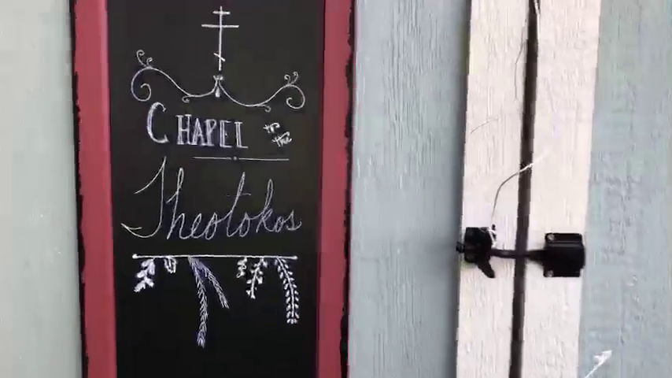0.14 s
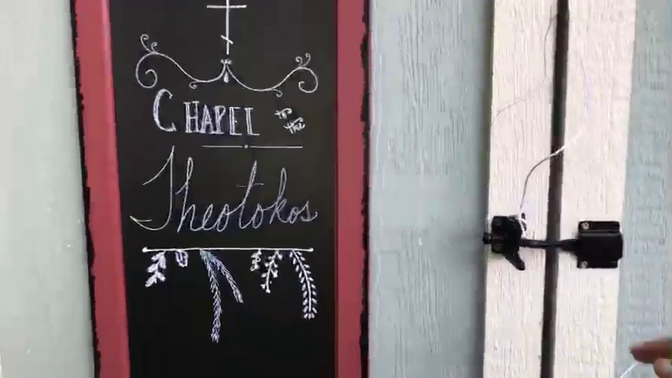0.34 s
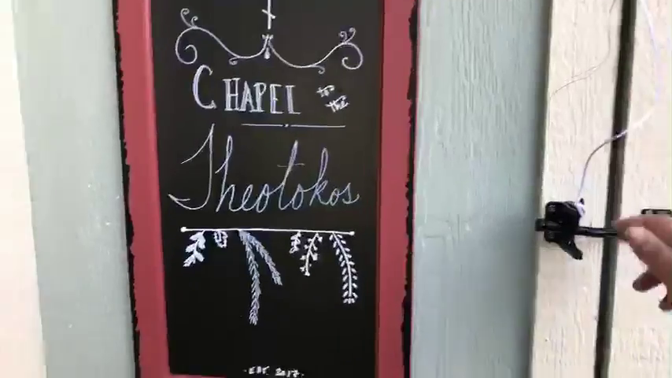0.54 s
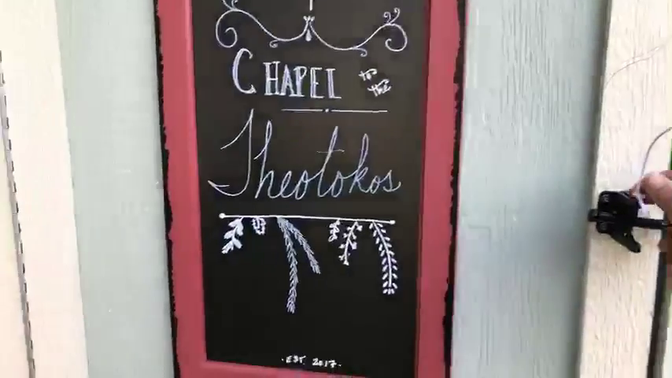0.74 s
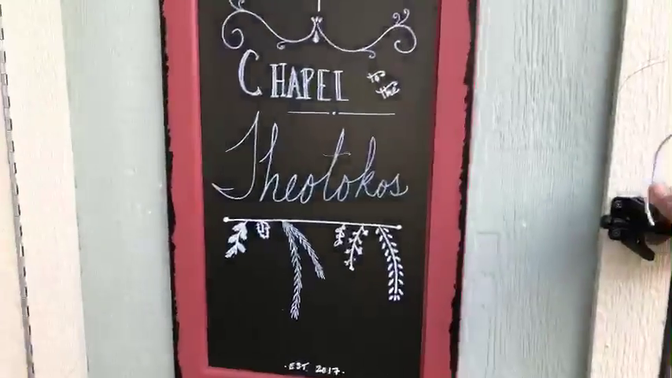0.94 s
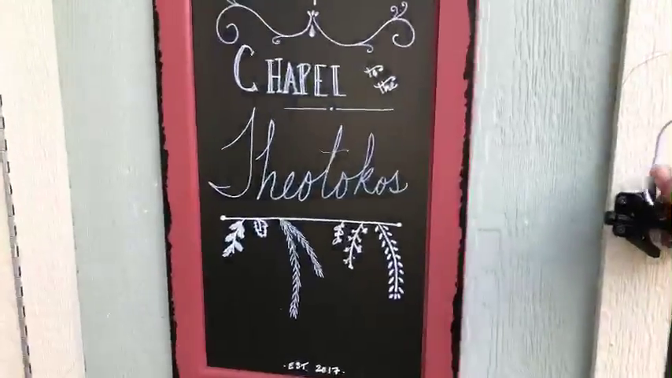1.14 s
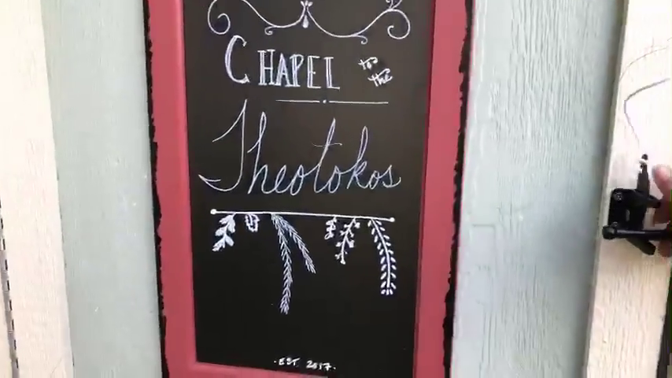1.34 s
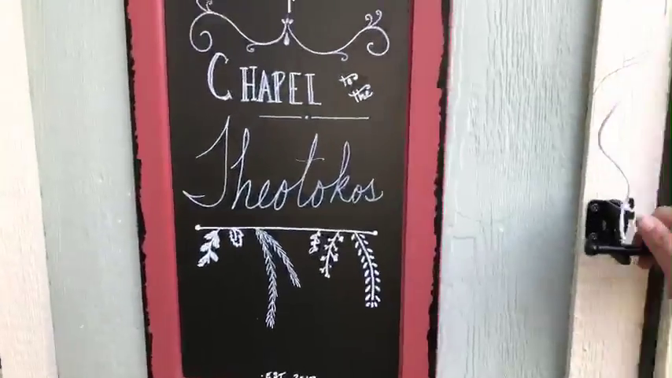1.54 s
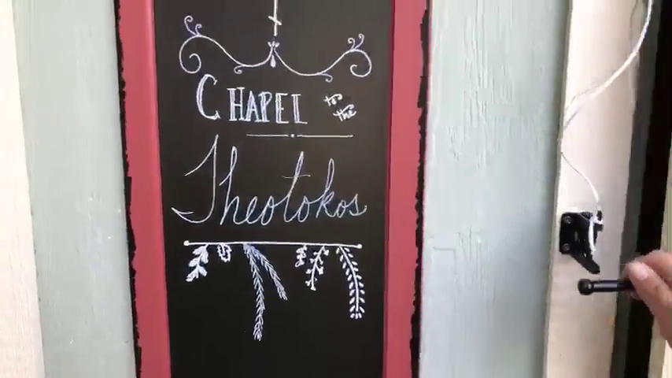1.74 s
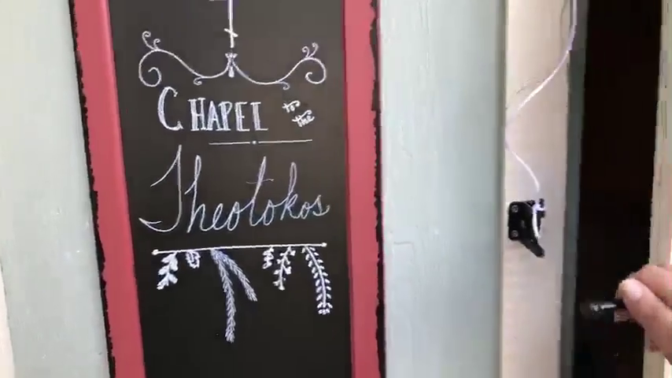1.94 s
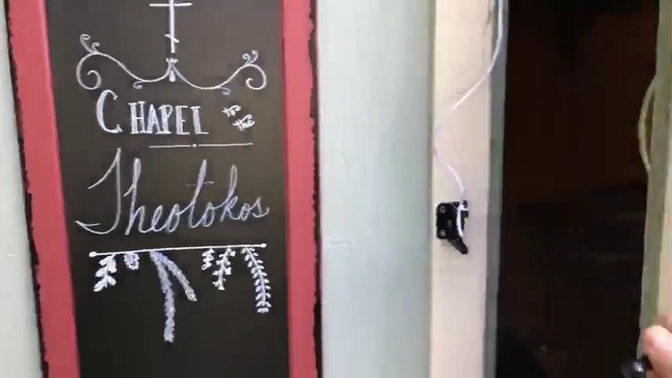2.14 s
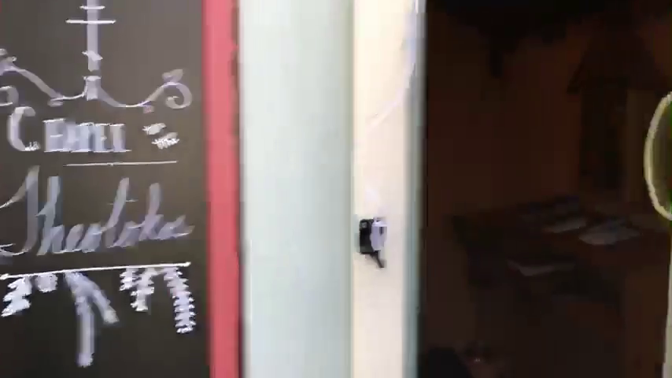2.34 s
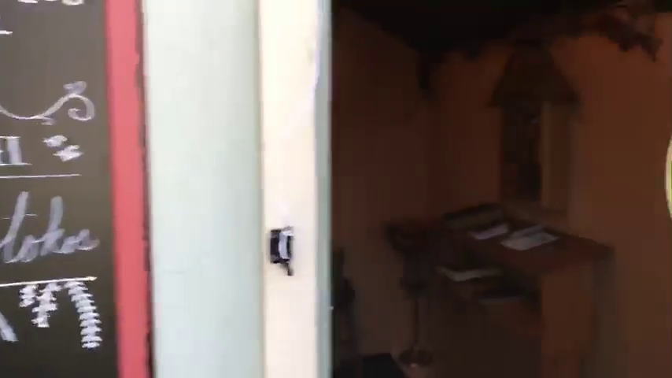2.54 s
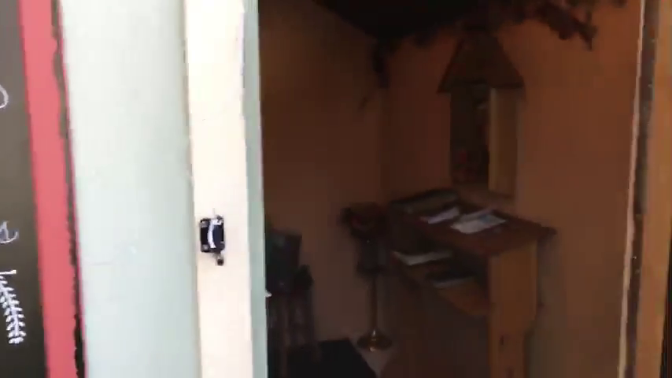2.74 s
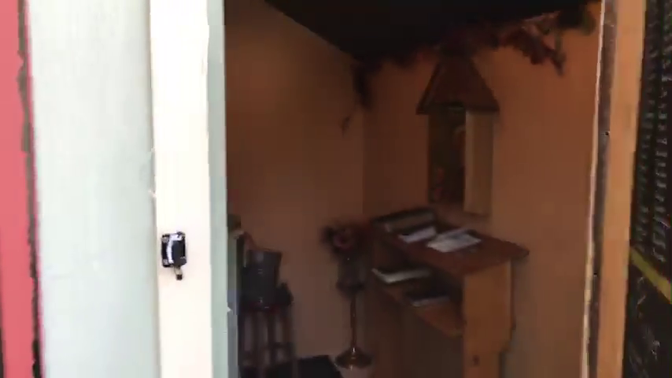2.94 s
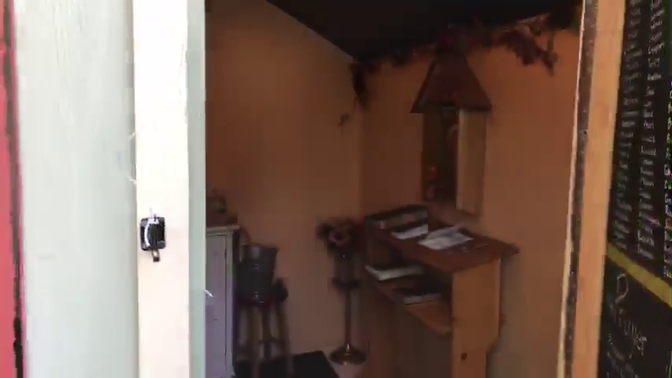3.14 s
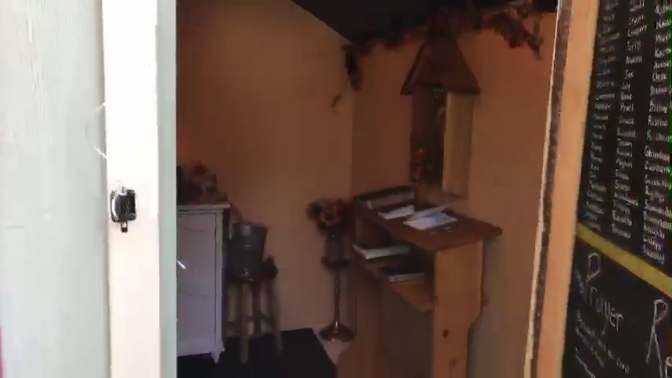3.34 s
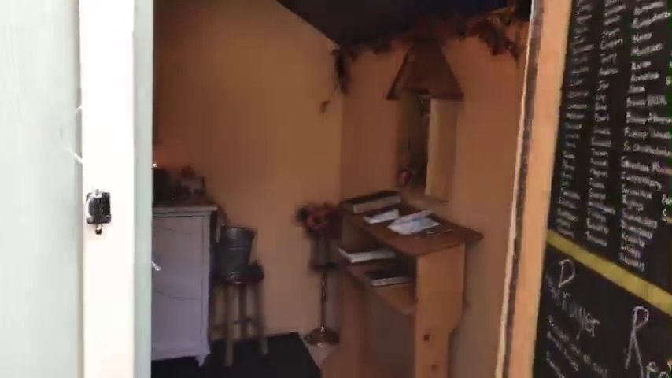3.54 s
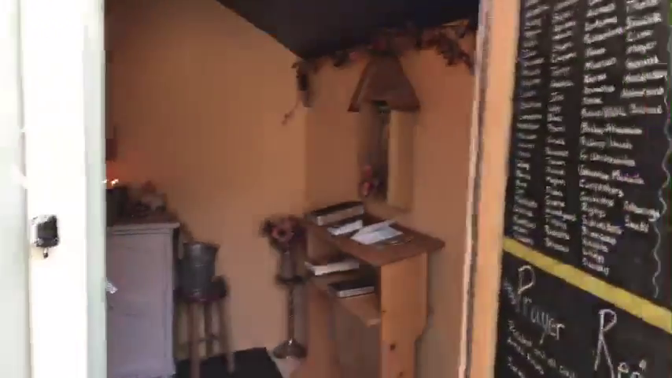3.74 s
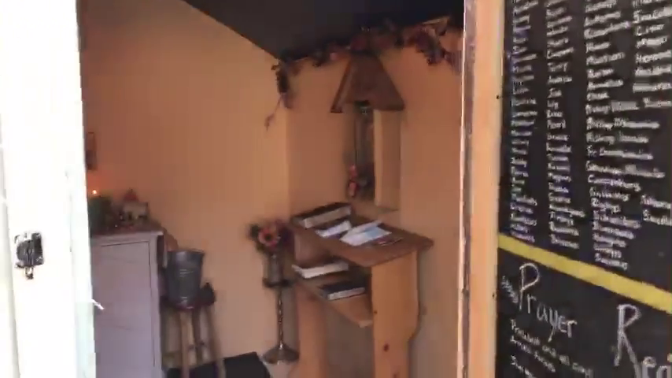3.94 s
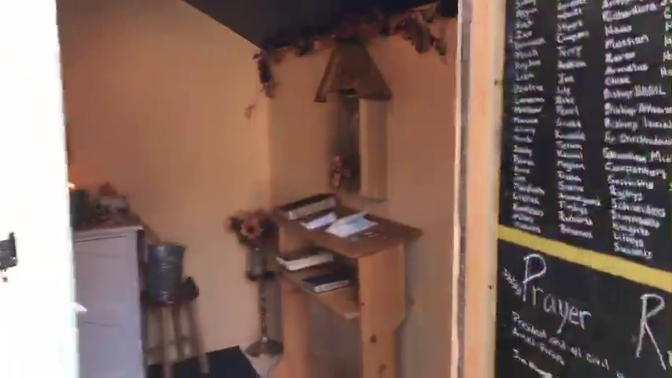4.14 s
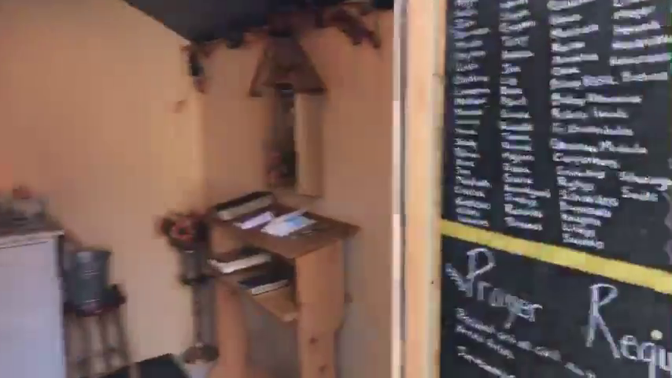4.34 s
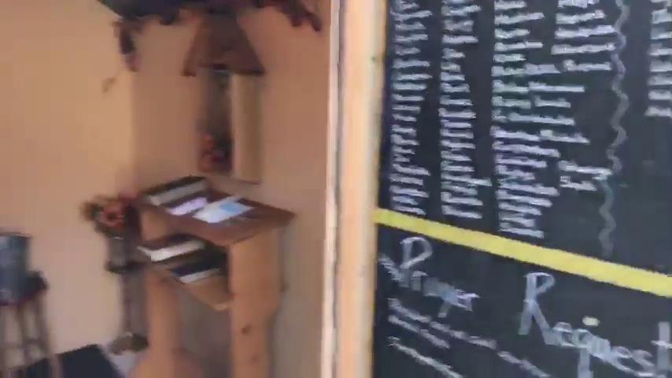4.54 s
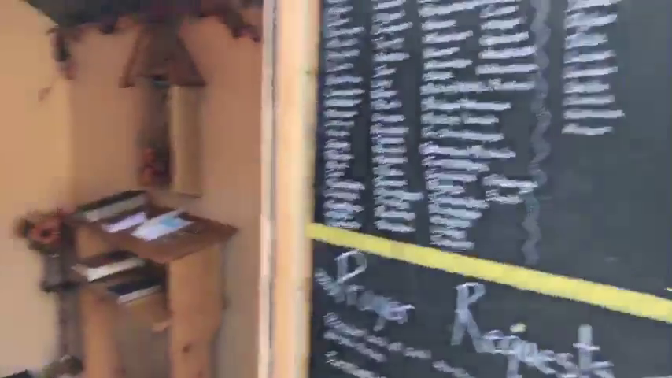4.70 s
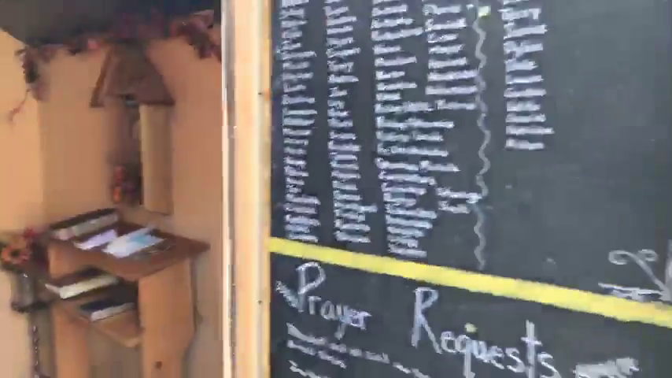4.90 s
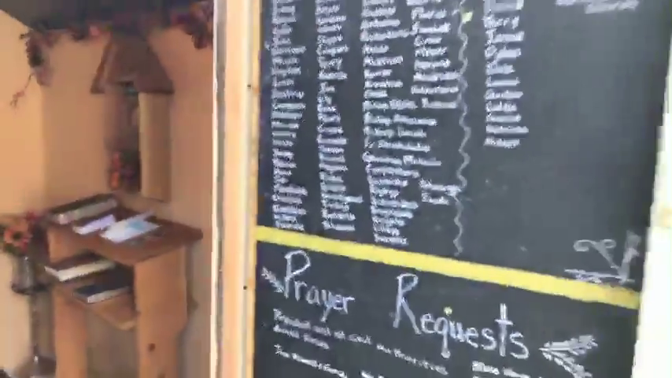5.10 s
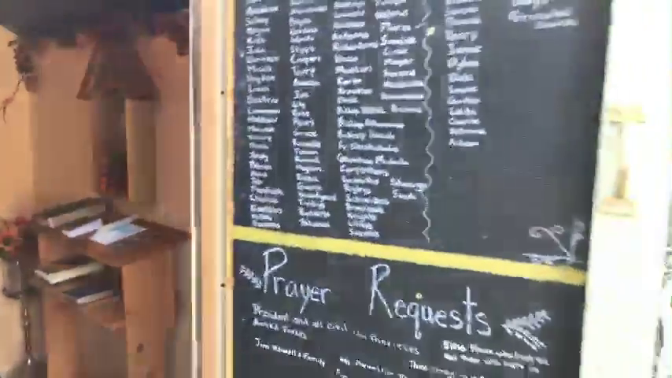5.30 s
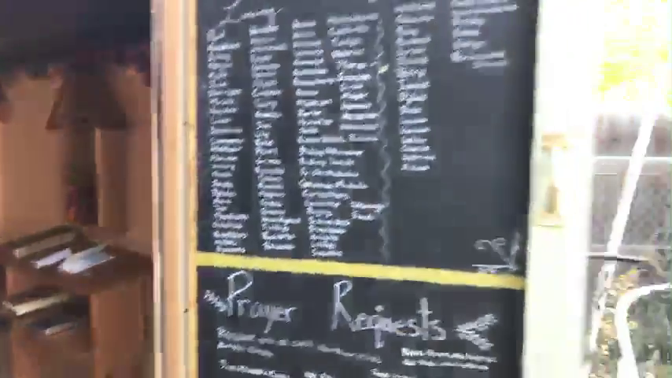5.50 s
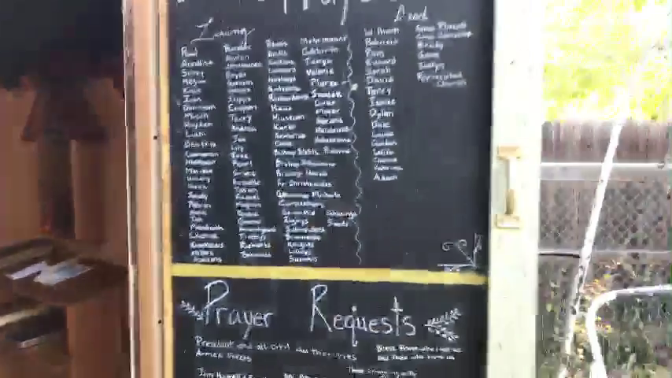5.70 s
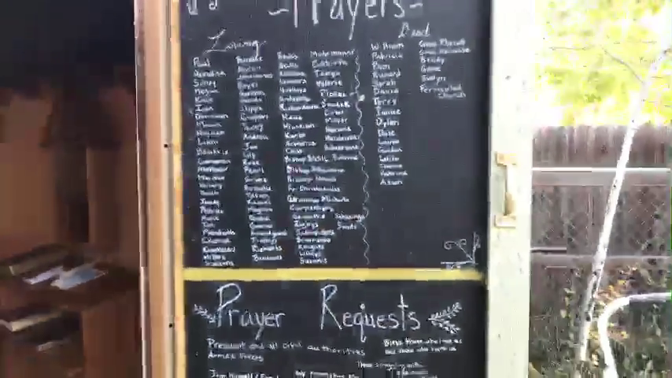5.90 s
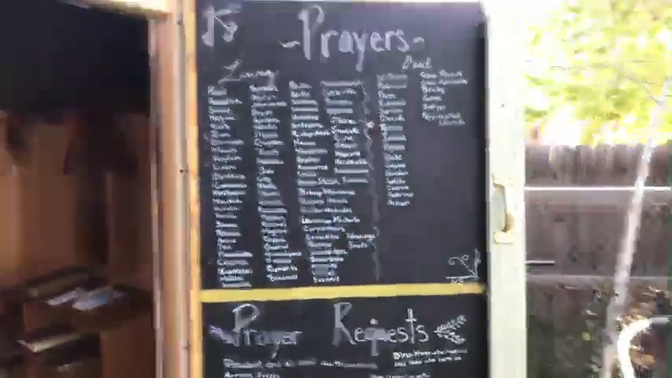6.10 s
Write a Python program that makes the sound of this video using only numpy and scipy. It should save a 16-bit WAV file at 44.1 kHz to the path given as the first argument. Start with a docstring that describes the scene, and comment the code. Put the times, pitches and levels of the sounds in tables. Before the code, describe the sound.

After a second of quiet steady wind, three loud latch strikes come in quick succession, each different: hollow knock, brightest crack with a springy ping, heavier clatter. Low wooden thuds follow as the door shakes. The rest is quiet, with sparse tiny hinge ticks and soft grainy rustles. Close microphone, short dull wooden after-sound, open air.

```python
"""A metal latch on a wooden shed door is opened close by: lever, catch and bar strike as noise clacks plus decaying sines.
The lever knocks up against its stop, the catch drops back with a thin ring, the bar clacks free and shakes the door.
Half-sine pushes thud the boards; the door ticks as it swings open, and light rustles of enveloped noise follow.
Outdoors, a steady light wind (shaped noise), a faint drone and fainter tones (narrow noise bands) lie behind."""
import sys
import numpy as np
from scipy import signal
from scipy.fft import rfft, irfft, next_fast_len
from scipy.io import wavfile

SR = 44100
rng = np.random.default_rng(int(sys.argv[2]) if len(sys.argv) > 2 else 0)


def to_wav(s):
    """Save 16-bit WAV."""
    ch = np.atleast_2d(s).T  # columns
    pcm = np.round(np.clip(ch, -1, 1) * 32767)  # PCM
    wavfile.write(sys.argv[1], SR, pcm.astype(np.int16))


N = 271639
TIME_S = np.arange(N) / SR
AGE_S = TIME_S[:SR // 2]   # time since a contact

# Contacts of each metal part. Each row: start in seconds, strength in dB.
LEVER_HITS = [(1.0985, -25), (1.1062, -1.5), (1.1160, -12.5)]
CATCH_HITS = [(1.3745, 2.5), (1.3776, -5), (1.3990, -26)]
BAR_HITS = [(1.5425, -30), (1.5548, -3), (1.5572, 1.5), (1.5630, -9.5)]
# Ringing modes of each part. Each row: frequency in Hz, relative level in dB, t60 in seconds.
LEVER_MODES = [(807, -7.5, 0.094), (1230, 1, 0.048), (1437, -21, 0.14), (1520, -9, 0.081),
               (1660, -26, 0.11), (2280, -11, 0.097), (2510, -21, 0.2), (3090, -9.5, 0.2)]
CATCH_MODES = [(590, -17, 0.13), (823, -14, 0.16), (1186, 1, 0.084), (1710, -6, 0.087), (1916, -3, 0.1),
               (2410, -11, 0.16), (2556, 3, 0.08), (3190, -3, 0.089), (3270, -6, 0.086), (3800, -7, 0.11),
               (4460, -16, 0.12), (4867, -13, 0.073), (5500, -17, 0.21), (6260, 0, 0.074),
               (6500, -8, 0.072), (6700, -24, 0.17)]
BAR_MODES = [(1185, 2, 0.07), (1230, -10, 0.079), (1342, 0, 0.078), (1620, -4, 0.08), (1860, -20, 0.14),
             (2150, -12, 0.093), (2470, -9, 0.1), (3100, -16, 0.1), (3460, -23, 0.16), (3660, -22, 0.18),
             (4030, -20, 0.13), (4328, -18, 0.097), (5300, -29, 0.17), (6030, -13, 0.077)]
# The lever's heavily damped main resonance. Each row: frequency in Hz, relative level in dB, t60 in seconds.
LEVER_KNOCK_MODES = [(1287, 3, 0.025), (1420, -8, 0.03)]
# High ring of the catch's thin steel. Each row: frequency in Hz, relative level in dB, t60 in seconds.
STEEL_MODES = [(7915, -27.5, 0.27), (8360, -37, .083), (9100, -28, 0.09), (11900, -41, .14)]
# The catch's spring pings as it seats. Each row: frequency in Hz, level in dB, t60 in seconds.
SPRING_MODES = [(14150, -24, 0.12), (13210, -41, .1)]
# Colour of each part's clack. Each row: frequency in Hz, relative density in dB per Hz.
LEVER_CLACK = [(300, -10), (700, -14), (1000, -7), (1400, 5), (2000, -2.5), (3100, -0.5), (4200, -10.5),
               (5800, -14.5), (7500, -27), (12000, -26), (16000, -46)]
CATCH_CLACK = [(180, -53), (300, -25), (946, -18), (1170, -6), (1530, -19), (2570, 4), (2880, -8),
               (3460, 0), (4670, -10), (5080, 7), (7440, -11.5), (9390, -0.5), (10200, -17), (11100, -6.5),
               (16000, -54)]
BAR_CLACK = [(250, -14), (750, -7.5), (1050, -12), (1250, -4), (2000, 4), (2900, -5), (3200, -13),
             (3800, -2), (4800, -6), (6300, -14), (7500, -24), (8900, -18), (10500, -39), (16000, -52)]
# Colour of the wood's after-sound. Each row: frequency in Hz, relative density in dB per Hz.
LEVER_TAIL = [(120, -43), (200, -3), (465, -9), (623, -1), (1020, -4), (1210, 4), (1980, -6), (3070, -2),
              (3760, -30), (5730, -22), (7140, -39), (9400, -41), (16000, -51)]
CATCH_TAIL = [(120, -41), (200, -17), (448, -13), (612, 3), (1400, -5), (2510, -0.5), (3620, -7),
              (6280, -7), (6880, -20), (8120, -6), (12400, -21), (14600, -15), (16000, -44)]
BAR_TAIL = [(120, -42), (200, 3.5), (278, -28.5), (440, -17), (482, -27), (696, -22), (791, -30),
            (851, -18), (1080, -29), (1370, -15.5), (2910, -24.5), (4350, -31), (16000, -66)]
# The catch rubs in its housing. Each row: start in seconds, level in dB, length in seconds.
SCRAPES = [(1.304, -36, 0.018), (1.335, -40, 0.0097)]
# Colour of that rub. Each row: frequency in Hz, relative density in dB per Hz.
SCRAPE_COLOUR = [(200, -5), (700, 2), (1000, 0), (1400, -1), (2200, -10), (2900, -4), (3800, -25),
                 (8000, -38), (16000, -47)]
# Door boards. Each row: frequency in Hz, relative level in dB, t60 in seconds.
DOOR_MODES = [(36, -12.5, 0.26), (76.5, -11, 0.11), (124, -3, .11), (176, 1.5, 0.15), (227, -5.5, 0.18),
              (290, -10.5, 0.1)]
# The latch jolts the door, which rocks in its frame. Each row: start in seconds, level in dB,
# first contact time in seconds, loss per rebound in dB (negative: louder).
DOOR_JOLTS = [(1.118, -33, .001, 12), (1.144, -18.5, 0.0083, 3), (1.385, -37.5, 0.0027, -2),
              (1.5564, -24.5, .0017, 0), (1.653, -26.5, 0.0058, 8)]
# Small ticks of latch and hinges. Each row: start in seconds, level in dB, resonance in Hz.
TICKS = [(1.0919, -35.5, 3000), (1.1302, -25.5, 3170), (1.1530, -41, 5000), (1.2040, -31, 14100),
         (2.267, -32.5, 7500), (2.3428, -30, 3200), (2.3474, -32.5, 1840), (2.7857, -34.5, 4080),
         (3.5915, -33.5, 5300), (4.1975, -43, 8000), (4.9136, -40, 12500), (5.332, -44, 6400)]
# Clearest rustles. Each row: crest in seconds, level in dB, rise time in seconds, centre in Hz.
RUSTLES = [(2.966, -54, .015, 10900), (3.385, -50, 0.017, 6850), (4.499, -41.5, 0.022, 6660),
           (4.66, -46.5, .018, 6400), (4.833, -46, 0.0064, 7460), (4.971, -47, 0.0058, 7850),
           (5.888, -47.5, .015, 11000)]
# Faint far tones. Each row: middle in seconds, level in dB, half length in seconds, frequency in Hz.
FAR_TONES = [(2.7, -60.5, 0.29, 538), (5.35, -59.5, 0.11, 695), (5.83, -58, .08, 695)]
# Colour of wind in the trees. Each row: frequency in Hz, relative density in dB per Hz.
AIR_COLOUR = [(240, -26), (400, -3), (460, -9.5), (538, -3.5), (609, -4), (648, -1), (690, -3.5),
              (1000, -4.5), (1650, -7), (3170, -8), (9280, -17), (10300, -23.5), (12300, -21.5),
              (15300, -27.5), (16500, -43)]
# Wind hiss, before the lift in wind(). Each row: time in seconds, level in dB.
AIR_LEVEL = [(0.0, -49.5), (1.75, -49), (2.99, -51.5), (3.96, -52), (6.1, -49)]
# Colour of the far rumble. Each row: frequency in Hz, relative density in dB per Hz.
RUMBLE_COLOUR = [(12, -37), (20, -7.5), (41, 0.5), (59, 2), (124, -4), (193, -12), (217, -12), (257, -15.5),
                 (338, -14), (450, -22), (580, -25), (990, -120)]

# Each rebound stays in contact longer and leaves a longer gap.
ROCK_GAP_S, ROCK_GAP_RATIO, ROCK_CONTACT_RATIO = 0.0226, 1.197, 1.5
# Tick at the reference pitch; higher ticks are shorter and more broadband.
TICK_HZ, TICK_DECAY_S, TICK_SKIRT_DB = 4000, 0.0026, -9.5
TICK_WIDTH_RATIO, TICK_SHORTENING_POWER, TICK_SKIRT_DB_PER_OCTAVE = 0.52, 0.4, 8
RUSTLE_RELEASE_RATIO, RUSTLE_WIDTH_HZ, RUSTLE_SKIRT_DB = 2.3, 4500, -3.5   # release time over rise time
STIR_FROM_S, STIR_TO_S, STIR_DB, STIR_HZ, STIR_WIDTH_HZ = 4.25, 5.95, -68.5, 12000, 7400
DRONE_SHUT_DB, DRONE_OPEN_DB, DRONE_FADE_FROM_S, DRONE_FADE_TO_S = -53.5, -60.5, 2.2, 4.16
SKIRT_CORNER_RATIO = 0.96   # skirt of a tick or rustle falls away around this multiple of its pitch


def lever(knock_rise_s=0.0023):
    """A damped resonance swells over a few cycles into a hollow knock, with clack, ring and wood."""
    knock = ring(LEVER_KNOCK_MODES) * (1 - np.exp(-(AGE_S / knock_rise_s) ** 2))
    crack = from_db(-17.0) * clack(LEVER_CLACK, rise_s=0.00054, length_s=0.0074)
    metal = from_db(-18.0) * ring(LEVER_MODES)
    wood = from_db(-20.5) * after_sound(LEVER_TAIL, t60_s=0.16)
    return play(LEVER_HITS, knock + crack + metal + wood)


def scrapes(grain_db=3):
    """Short gritty rubs as the catch lifts: noise bursts with fast random level."""
    out = np.zeros(N)
    for start_s, db, length_s in SCRAPES:
        add(out, start_s, from_db(db) * clack(SCRAPE_COLOUR, rise_s=0.0024, length_s=length_s))
    return out * from_db(grain_db * drift(rate_hz=500))


def catch(seat_s=1.3818):
    """The brightest blow; its light steel goes on ringing and its spring pings."""
    crack = from_db(-6.5) * chatter(CATCH_HITS, CATCH_CLACK, rise_s=0.0002, length_s=0.003)
    metal = from_db(-23.5) * ring(CATCH_MODES) + ring(STEEL_MODES)
    wood = from_db(-18.5) * after_sound(CATCH_TAIL, t60_s=0.11)
    # the first contact sets steel and wood ringing, the rebounds only crack
    body = play(CATCH_HITS[:1], metal + wood)
    spring = play([(seat_s, 0)], ring(SPRING_MODES))
    return crack + body + spring


def bar(release_s=1.5572):
    """The heavy bar slips off its keeper with a longer, darker clack, and rings once it is free."""
    crack = from_db(-7.5) * chatter(BAR_HITS, BAR_CLACK, rise_s=0.00063, length_s=0.0036)
    metal = from_db(-18.5) * ring(BAR_MODES)
    wood = from_db(-18.0) * after_sound(BAR_TAIL, t60_s=0.15)
    return crack + play([(release_s, 0)], metal + wood)


def door(pushes=3):
    """Each jolt is a run of half-sine pushes on the boards; the longer the contact, the deeper the thud."""
    out = np.zeros(N)
    boards = ring(DOOR_MODES)
    for start_s, db, first_contact_s, loss_db in DOOR_JOLTS:
        for k in range(pushes):
            contact_s = first_contact_s * ROCK_CONTACT_RATIO ** k
            force = np.sin(np.pi * AGE_S[AGE_S < contact_s] / contact_s)
            thud = signal.fftconvolve(boards, force / force.sum())
            add(out, start_s, from_db(db - k * loss_db) * thud)
            start_s += ROCK_GAP_S * ROCK_GAP_RATIO ** k
    return out


def ticks(echo_db=-16, echo_t60_s=0.2):
    """Each slip excites one broad resonance and a faint echo; the higher its pitch, the sooner both die."""
    out = np.zeros(N)
    for start_s, db, hz in TICKS:
        age_s = AGE_S * (hz / TICK_HZ) ** TICK_SHORTENING_POWER   # clock runs faster for higher pitch
        skirt_db = TICK_SKIRT_DB + TICK_SKIRT_DB_PER_OCTAVE * np.log2(hz / TICK_HZ)
        envelope = np.exp(-age_s / TICK_DECAY_S) + from_db(echo_db - 60 * age_s / echo_t60_s)
        grit = noise(scuff(hz, TICK_WIDTH_RATIO * hz, skirt_db), len(AGE_S))
        add(out, start_s, from_db(db) * envelope * grit)
    return out


def rustles(grain_db=3, patchy_db=3):
    """Grainy friction hiss swells quickly and dies more slowly, over a spell of faint random stirring."""
    stirring = (TIME_S > STIR_FROM_S) & (TIME_S < STIR_TO_S)
    stir_gain = from_db(STIR_DB + patchy_db * drift(rate_hz=14))
    out = stirring * stir_gain * noise(resonance(STIR_HZ, STIR_WIDTH_HZ), N)
    middle_s = AGE_S.mean()
    since_crest_s = AGE_S - middle_s
    for crest_s, db, rise_s, hz in RUSTLES:
        rise = (since_crest_s / rise_s) ** 2
        release = since_crest_s / (RUSTLE_RELEASE_RATIO * rise_s)
        envelope = np.exp(-np.where(since_crest_s < 0, rise, release))
        hiss = noise(scuff(hz, RUSTLE_WIDTH_HZ, RUSTLE_SKIRT_DB), len(AGE_S))
        add(out, crest_s - middle_s, from_db(db) * envelope * hiss)
    return out * from_db(grain_db * drift(rate_hz=160))


def wind(lift_db=0.44, flutter_db=0.4, rumble_db=-46.65, buffet_db=0.5):
    """Smooth hiss over a lumpy rumble: two shaped noises, each with a slightly random level."""
    hiss_gain = level(AIR_LEVEL) * from_db(lift_db + flutter_db * drift(rate_hz=6.5))
    rumble_gain = from_db(rumble_db + buffet_db * drift(rate_hz=3.0))
    return hiss_gain * noise(shape(AIR_COLOUR), N) + rumble_gain * noise(shape(RUMBLE_COLOUR), N)


def drone(hz=262, width_hz=45):
    """A narrow, wavering low band of noise fades as the door opens."""
    fade = level([(DRONE_FADE_FROM_S, DRONE_SHUT_DB), (DRONE_FADE_TO_S, DRONE_OPEN_DB)])
    return fade * noise(resonance(hz, width_hz), N)


def far_tones(width_hz=17):
    """Faint tones come and go: bell-shaped swells of noise in one narrow resonance each."""
    out = np.zeros(N)
    bell_middle_s = AGE_S.mean()
    for middle_s, db, half_s, hz in FAR_TONES:
        bell = np.exp(-((AGE_S - bell_middle_s) / half_s) ** 2)
        tone = noise(resonance(hz, width_hz), len(AGE_S))
        add(out, middle_s - bell_middle_s, from_db(db) * bell * tone)
    return out


def clack(colour, rise_s, length_s):
    """Metal chatters on metal: a dense noise burst of steady energy."""
    envelope = (1 - np.exp(-AGE_S / rise_s)) * np.exp(-(AGE_S / length_s) ** 2)
    burst = noise(shape(colour), len(AGE_S)) * envelope
    return burst * np.sqrt(np.sum(envelope ** 2) / np.sum(burst ** 2))


def chatter(hits, colour, rise_s, length_s):
    """Every contact makes a clack of its own."""
    out = np.zeros(N)
    for start_s, db in hits:
        add(out, start_s, from_db(db) * clack(colour, rise_s, length_s))
    return out


def after_sound(colour, t60_s, late_db=-24, late_t60_s=0.52, late_hz=3500, build_s=0.0029):
    """Crowded modes of the wood die quickly; a duller echo from the walls lingers."""
    bright = shape(colour)
    wood = noise(bright, len(AGE_S)) * from_db(-60 * AGE_S / t60_s)
    dull_noise = noise(lambda f: bright(f) / np.hypot(1, f / late_hz), len(AGE_S))
    walls = dull_noise * from_db(late_db - 60 * AGE_S / late_t60_s)
    return (wood + walls) * (1 - np.exp(-AGE_S / build_s))


def ring(modes):
    """Free vibration: decaying sines, neighbours in opposite sign."""
    out = np.zeros(len(AGE_S))
    for k, (hz, db, t60_s) in enumerate(modes):
        out += (-1) ** k * from_db(db - 60 * AGE_S / t60_s) * np.sin(2 * np.pi * hz * AGE_S)
    return out


def play(hits, sound):
    """The same body struck at each contact."""
    out = np.zeros(N)
    for start_s, db in hits:
        add(out, start_s, from_db(db) * sound)
    return out


def add(out, start_s, sound):
    """Mix a sound in at a time."""
    start = round(start_s * SR)
    out[start:start + len(sound)] += sound[:N - start]


def scuff(hz, width_hz, skirt_db):
    """Colour of a small contact: one resonance on a broad skirt that dulls above it."""
    def colour(f):
        skirt = from_db(skirt_db) / (1 + (f / (SKIRT_CORNER_RATIO * hz)) ** 2) ** 0.84
        return resonance(hz, width_hz)(f) + skirt
    return colour


def resonance(hz, width_hz):
    """Colour of one steep-sided resonance."""
    return lambda f: 1 / (1 + ((f * f - hz * hz) / (f * width_hz)) ** 2)


def shape(points):
    """Colour through (Hz, dB) points, straight over log frequency."""
    hz, db = np.transpose(points)
    return lambda f: from_db(np.interp(np.log(f), np.log(hz), db))


def noise(colour, size):
    """Unit-power noise whose relative gain at each frequency is colour(Hz)."""
    padded = next_fast_len(size)
    white = rfft(rng.standard_normal(padded))
    gain = colour(np.linspace(1, SR / 2, len(white)))
    return rms_one(irfft(white * gain, padded)[:size])


def drift(rate_hz):
    """Low-passed random wander with spread 1."""
    return noise(lambda f: 1 / (1 + (f / rate_hz) ** 2), N)


def level(rows):
    """Gain over time from (s, dB) rows."""
    return from_db(np.interp(TIME_S, *np.transpose(rows)))


def rms_one(x):
    """Scale to unit power."""
    return x / np.sqrt(np.mean(x ** 2) + 1e-20)


def from_db(db):
    """Decibels to gain."""
    return 10 ** (np.asarray(db) / 20)


def scene():
    """Latch, door and outdoor air at one microphone."""
    latch = lever() + scrapes() + catch() + bar()
    outdoors = wind() + drone() + far_tones()
    return (latch + door() + ticks() + rustles() + outdoors)[None]


def record(dry, ceiling=0.92, cutoff_hz=16300):
    """The highest peaks are rounded and the top is cut."""
    rounded = dry / (1 + (dry / ceiling) ** 4) ** 0.25
    low_pass = signal.ellip(10, 0.1, 80, cutoff_hz, fs=SR, output="sos")   # ripple and stopband in dB
    return signal.sosfilt(low_pass, rounded)


dry = scene()
out = record(dry)
to_wav(out)
```